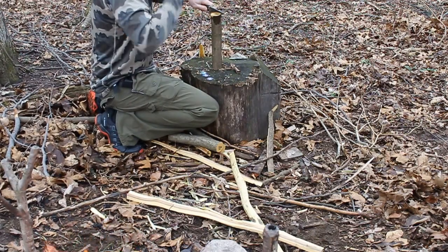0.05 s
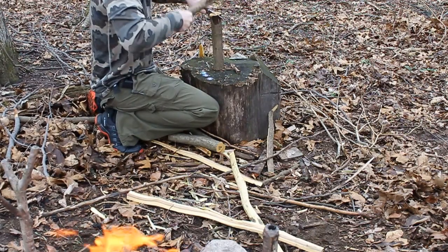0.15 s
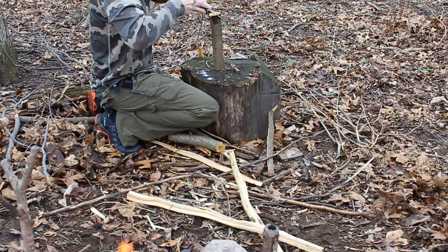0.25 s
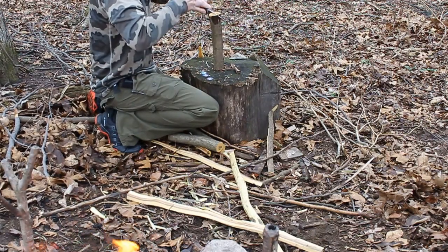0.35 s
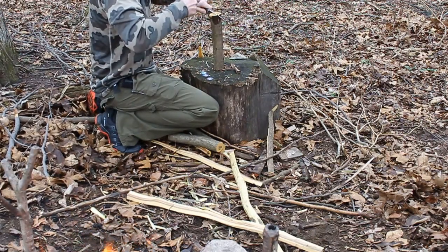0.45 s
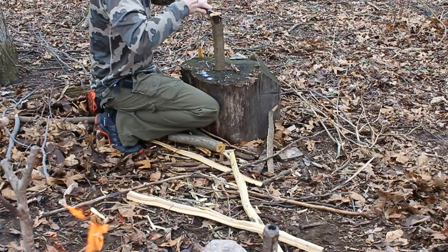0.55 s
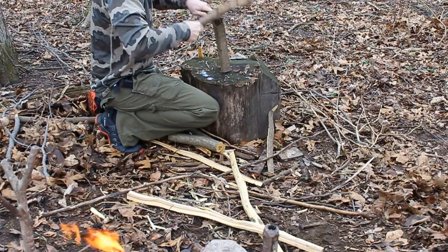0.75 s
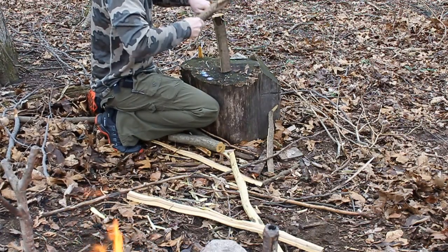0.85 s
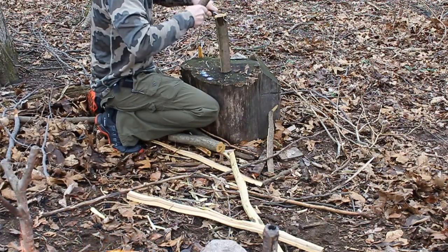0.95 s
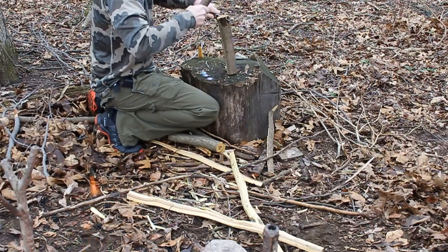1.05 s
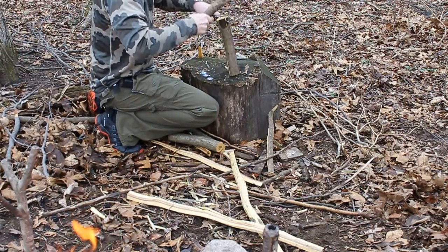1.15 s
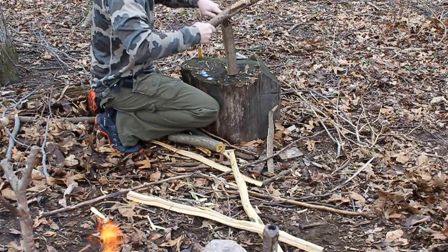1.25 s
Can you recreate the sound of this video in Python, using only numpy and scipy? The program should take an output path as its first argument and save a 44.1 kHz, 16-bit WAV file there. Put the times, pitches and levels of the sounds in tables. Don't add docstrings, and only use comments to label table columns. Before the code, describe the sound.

Uneven sharp wood knocks with a brief bladed ring and thin woodland echo, two close together early and one later; between them soft low flame flutter, tiny crackles and faint sleeve and leaf rustle, outdoors, slightly overloaded microphone.

```python
import sys
import numpy as np
from scipy import signal
from scipy.fft import rfft, irfft
from scipy.io import wavfile
from scipy.ndimage import uniform_filter1d

SR = 44100
rng = np.random.default_rng(int(sys.argv[2]) if len(sys.argv) > 2 else 0)


def to_wav(s):
    ch = np.atleast_2d(s).T
    pcm = np.round(np.clip(ch, -1, 1) * 32767)
    wavfile.write(sys.argv[1], SR, pcm.astype(np.int16))


def to_linear_factor(level_db):
    exponent = np.asarray(level_db, float) / 20
    return 10 ** exponent


N = 57330


def evened(x):
    return x / np.sqrt(np.mean(x ** 2) + 1e-20)


def add(mix, start_s, sound):
    part = mix[round(start_s * SR):][:len(sound)]
    part += sound[:len(part)]


def band(x, low_hz, high_hz):
    edges_hz = [low_hz, min(high_hz, SR / 2.1)]
    return signal.sosfilt(signal.butter(2, edges_hz, "bandpass", fs=SR, output="sos"), x)


def tint(x, colour):
    hz, db = np.transpose(colour)
    bins_hz = np.fft.rfftfreq(len(x), 1 / SR)
    gain_db = np.interp(np.log(bins_hz + 1), np.log(hz), db)
    return irfft(rfft(x) * to_linear_factor(gain_db), len(x))


def noise(colour, patchy_db, flicker_db):
    frames = N // 128 + 9
    real, imag, chance = rng.standard_normal((frames, 257, 3)).T
    flicker = evened(uniform_filter1d(chance[0], size=2))
    patches = uniform_filter1d(chance, size=6, axis=0)
    patches = evened(uniform_filter1d(patches, size=16, axis=1))
    spectra = (real + 1j * imag) * to_linear_factor(patchy_db * patches + flicker_db * flicker)
    x = signal.istft(spectra, nperseg=512, noverlap=384)[1][:N]
    return evened(tint(x, colour))


# time in seconds, level in dB.
FLAME_LEVEL = [(0, -49), (.02, -40.5), (.09, -41), (.135, -45.5), (.2, -43.5), (.26, -46), (.4, -43),
               (.54, -41), (0.629, -44), (.69, -40.5), (.75, -44.5), (.8, -43.5), (0.899, -37), (1, -40.5),
               (1.125, -42), (1.18, -43), (1.235, -39.5), (1.3, -41.5)]
# frequency in Hz, level in dB.
FLAME_COLOUR = [(25, -17.5), (50, -2), (105, 1.5), (200, -9), (400, -11), (900, -22), (1500, -34.5),
                (6000, -82)]


def flame_flutter():
    time_s, level_db = np.transpose(FLAME_LEVEL)
    swell = to_linear_factor(np.interp(np.arange(N) / SR, time_s, level_db))
    return swell * noise(FLAME_COLOUR, patchy_db=1.2, flicker_db=2.2)


# frequency in Hz, level in dB.
AIR_COLOUR = [(200, -3.5), (700, 7), (1500, -5.5), (6500, -5.5), (8000, -4), (10000, -16), (13000, -26.5),
              (15500, -37)]


def woodland_air():
    return to_linear_factor(-49) * noise(AIR_COLOUR, patchy_db=.7, flicker_db=.3)


def crackle(peak_db, hz, width_hz, snap_db):
    t = np.arange(600) / SR
    roughness = 1 + 2.0 * uniform_filter1d(rng.standard_normal(600), size=8)
    decay = np.exp(-t * max(width_hz, 100) / 2)
    onset = np.minimum(t / 0.00016, 1)
    ring = np.sin(2 * np.pi * hz * t) * decay * onset * roughness
    snap = band(rng.standard_normal(600) * np.exp(-t / .0007), 3500, 11000)
    return to_linear_factor(peak_db) * (band(ring, 0.44 * hz, 1.32 * hz) + to_linear_factor(snap_db) * snap)


# start in seconds, peak level in dB, ring frequency in Hz, bandwidth in Hz,
# snap level in dB.
BURSTS = [(0.0753, -35, 11000, 2500, 4), (.172, -12.5, 1810, 710, -67), (.381, -31.5, 6060, 3000, -10),
          (.492, -27, 6200, 3000, -10), (0.495, -30.5, 7600, 1200, -20), (0.6087, -24, 6830, 3520, -8),
          (.6729, -34.5, 5470, 1500, -32.5), (.679, -41, 8000, 3000, -5), (0.7035, -31, 3000, 3000, -11),
          (.8274, -22, 7100, 1400, -25), (0.8377, -23, 5330, 2200, -16), (0.845, -35, 8000, 1500, -23),
          (0.8787, -31, 3960, 600, -23), (0.8789, -39, 2480, 500, -21), (0.89, -46, 9500, 3000, 0),
          (0.9923, -21, 7130, 2580, -16), (.992, -31, 3000, 1000, -30), (1.0044, -29.5, 7200, 1930, -17),
          (1.0677, -34, 3550, 1800, -17), (1.068, -38.5, 1870, 1200, -26.5),
          (1.1534, -37.5, 7600, 3000, -12), (1.164, -42, 7080, 3000, 3), (1.2403, -45, 6940, 2000, -20),
          (1.2794, -48, 9100, 3000, -1)]


def add_crackles(mix):
    for start_s, *settings in BURSTS:
        add(mix, start_s, crackle(*settings))


BLADE_FROM_HZ = 3700


def struck_stick(modes, swing, crack_db, blade_s):
    t = np.arange(SR) / SR
    late = 1 - np.exp(-(t / blade_s) ** 2)
    ring = np.zeros(SR)
    for hz, db, t60_s in modes:
        mode = to_linear_factor(db - 60 * t / t60_s) * np.sin(2 * np.pi * hz * t)
        ring += mode * (late if hz > BLADE_FROM_HZ else 1)
    crack = evened(band(rng.standard_normal(SR), 1500, 7900))
    crack = crack * to_linear_factor(crack_db - 60 * t / 0.014) * late
    soft_start = np.minimum(t / 0.00042, 1)
    return swing * ring * soft_start + crack


def ground_scatter(dry):
    t = np.arange(SR) / SR
    ground = rng.standard_normal(SR) * to_linear_factor(-60 * t / 0.064) * (t > .002)
    onset = dry * np.exp(-t / 0.001)
    return to_linear_factor(-7) * signal.fftconvolve(onset, ground / np.linalg.norm(ground))[:SR]


# frequency in Hz, level in dB.
TREE_COLOUR = [(600, -9.5), (1250, -4), (1720, 4.5), (2300, -4), (4000, -3.5), (6500, -5), (9000, -24),
               (13000, -52)]


def tree_echo():
    t = np.arange(SR) / SR
    trees = evened(tint(rng.standard_normal(SR), TREE_COLOUR))
    body = band(trees, 100, BLADE_FROM_HZ)
    treble = trees - body
    tail = body * to_linear_factor(-60 * t / 1.89) + treble * to_linear_factor(-60 * t / 0.76)
    return tail * (1 - np.exp(-t / 0.018))


def knock(modes, swing, strength_db, crack_db, echo_db, blade_s):
    dry = struck_stick(modes, swing, crack_db, blade_s)
    near = dry + ground_scatter(dry)
    near = signal.sosfilt(signal.butter(4, 9500, fs=SR, output="sos"), near)
    return to_linear_factor(strength_db) * (near + to_linear_factor(echo_db - 23.5) * tree_echo())


# start in seconds, strength in dB, crack level in dB, echo level in dB,
# time the blade takes to start ringing in seconds.
BLOWS = [
    (.0757, -18.5, -7.5, -14, 0.00053),
    (.1568, 8, 8, -19.5, 0.0021),
    (.8087, -3.5, -5.5, -23.5, 0.00067),
]
SWINGS = (-1, -1, 1)
# frequency in Hz, level in dB, t60 in seconds.
PLACING_MODES = [(1090, -3, 0.0072), (3000, -31, 0.011), (5870, 1, 0.0091), (7200, -10, 0.02),
                 (8450, -7, 0.012), (11000, -16, .006)]
# frequency in Hz, level in dB, t60 in seconds.
FIRST_KNOCK_MODES = [(130, -20.5, 0.049), (345.6, -19, 0.059), (500, -20, 0.041), (669, -14, 0.039),
                     (1000, -5.5, 0.021), (1451, 2, 0.019), (1714, 2.5, 0.022), (2064, -3.5, 0.019),
                     (3006, 2.5, 0.018), (3425, 0.5, 0.014), (4668, -0.5, 0.016), (5610, 1.5, 0.017),
                     (6630, 3.5, 0.014), (899, -17, 0.035)]
# frequency in Hz, level in dB, t60 in seconds.
SECOND_KNOCK_MODES = [(99, -38, 0.041), (233, -17.5, 0.054), (600, -46, 0.013), (1134, 0, 0.013),
                      (1388, 1, 0.0051), (1795, -2, 0.01), (2702, -8, 0.019), (3761, 10.5, 0.006),
                      (4780, -6, 0.0072), (5882, 3, 0.011), (6500, 8, 0.0098), (7460, -5.5, 0.011),
                      (9300, -45, 0.013)]


def add_knocks(mix):
    modes_by_blow = (PLACING_MODES, FIRST_KNOCK_MODES, SECOND_KNOCK_MODES)
    for (start_s, *settings), modes, swing in zip(BLOWS, modes_by_blow, SWINGS):
        add(mix, start_s, knock(modes, swing, *settings))


def rustle(length_s, level_db, hz):
    t = np.arange(0, .15, 1 / SR)
    when, size, sign = rng.random((3, len(t)))
    scratches = when < 3500 / SR
    grains = scratches * to_linear_factor(-2.5 * np.log(size + 0.00885)) * np.sign(sign - .5)
    grains = band(grains, 0.42 * hz, 1.65 * hz)
    grains = band(band(grains, 500, 8000), 500, 8000)
    swell = np.sin(np.pi * np.minimum(t / length_s, 1) ** 0.56) ** 2
    return to_linear_factor(level_db) * evened(grains) * swell


# start in seconds,
# length in seconds, level in dB, centre frequency in Hz.
MOVEMENTS = [
    (0.076, .02, -40.5, 7550),
    (0.087, .03, -53, 6500),
    (0.159, 0.068, -35, 5800),
    (0.619, 0.072, -47, 5030),
    (0.769, 0.036, -58, 7030),
    (0.811, 0.071, -38.5, 5600),
    (1.029, 0.12, -50, 4650),
    (1.135, 0.049, -66, 6050),
]


def add_rustles(mix):
    for start_s, *settings in MOVEMENTS:
        add(mix, start_s, rustle(*settings))


def scene():
    mix = flame_flutter() + woodland_air()
    add_crackles(mix)
    add_knocks(mix)
    add_rustles(mix)
    return mix[None]


def gain_cut_db(dry):
    limit_db, share, max_cut_db = -12.5, 0.34, 8.5
    grab_s, recover_db_s = 0.0031, 56
    peak_db = 20 * np.log10(abs(dry[0]) + 1e-6)
    fall_db = np.arange(N) * recover_db_s / SR
    held_db = np.maximum.accumulate(peak_db + fall_db) - fall_db
    cut_db = np.minimum(share * np.maximum(held_db - limit_db, 0), max_cut_db)
    keep = np.exp(-1 / (grab_s * SR))
    for _ in range(2):
        cut_db = signal.lfilter([1 - keep], [1, -keep], cut_db)
    return cut_db


def top_cut(x):
    return signal.sosfilt(signal.butter(12, 20000, fs=SR, output="sos"), x)


def record(dry):
    x = np.clip(dry * to_linear_factor(-gain_cut_db(dry)), -1, 1)
    x = signal.sosfilt(signal.butter(1, 48.6, "highpass", fs=SR, output="sos"), x)
    x = signal.oaconvolve(x, signal.firwin(101, 15600, fs=SR)[None], "same")
    return top_cut(x)


dry = scene()
out = record(dry)
to_wav(out)
```